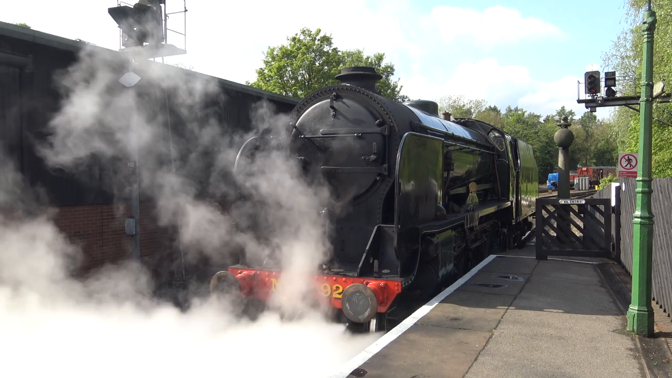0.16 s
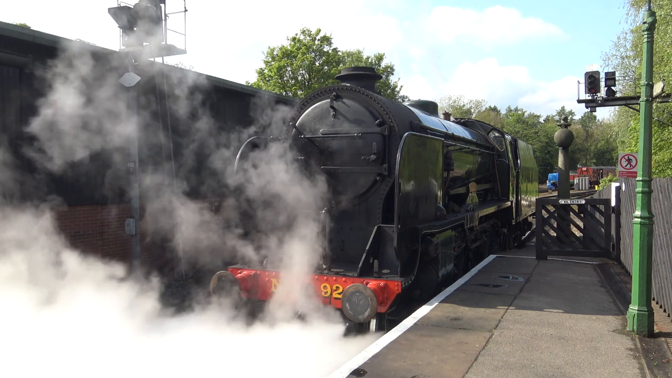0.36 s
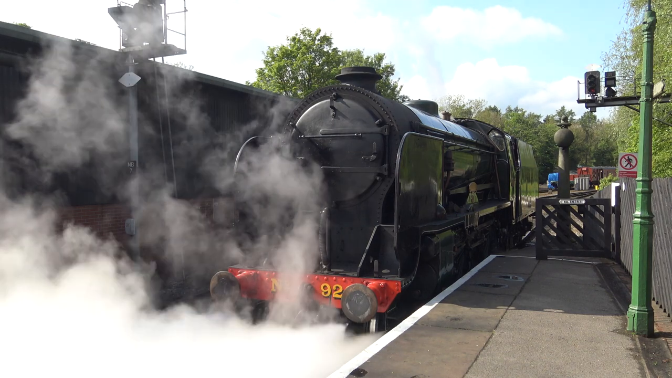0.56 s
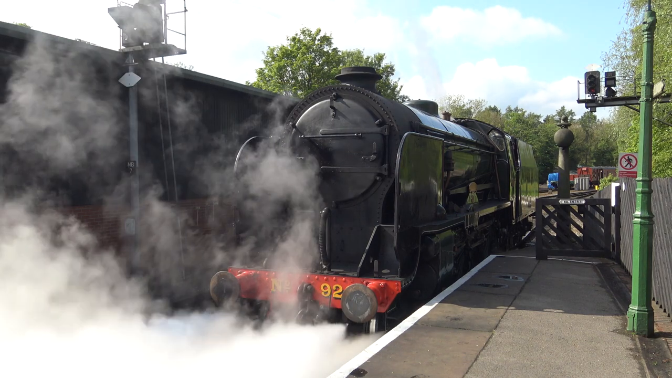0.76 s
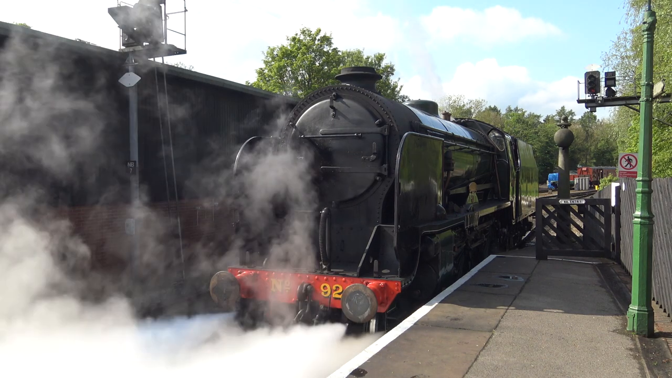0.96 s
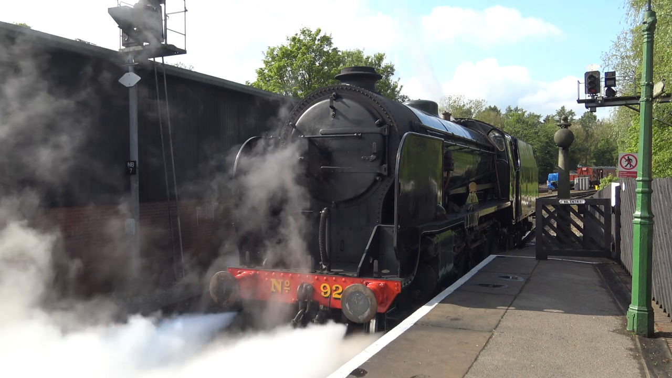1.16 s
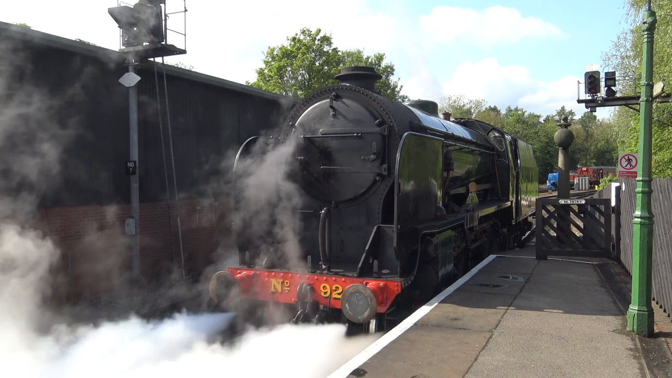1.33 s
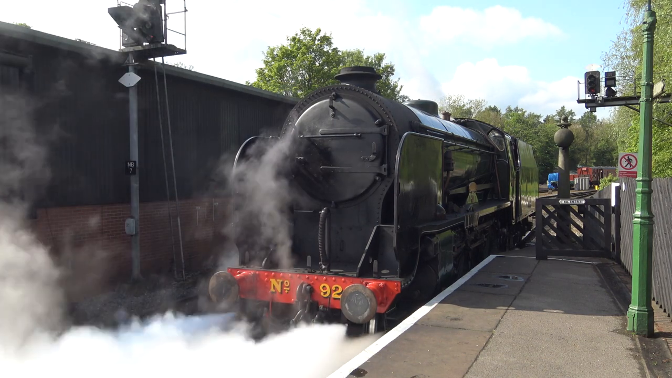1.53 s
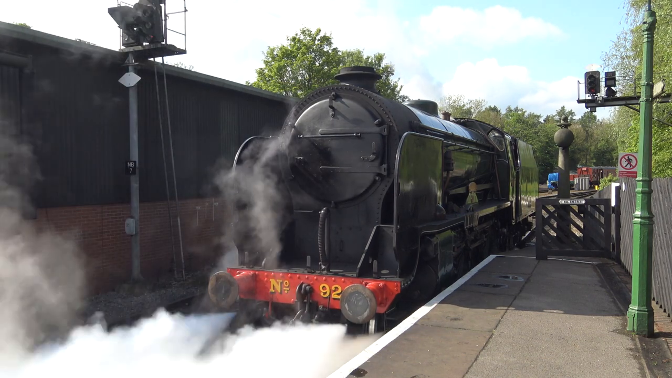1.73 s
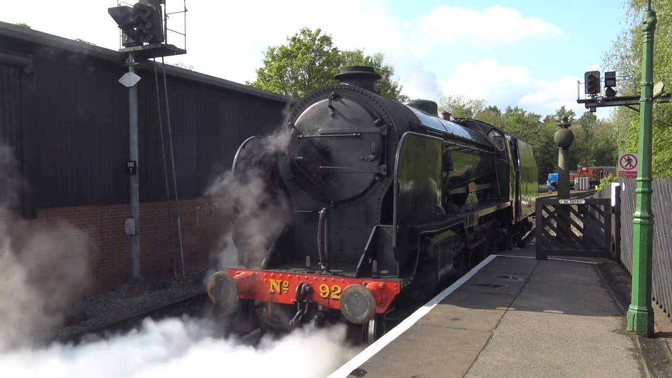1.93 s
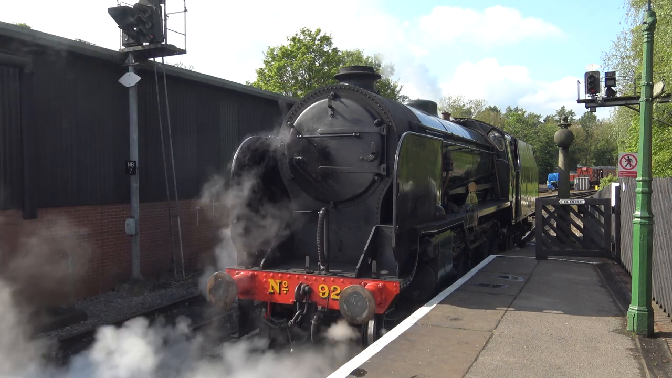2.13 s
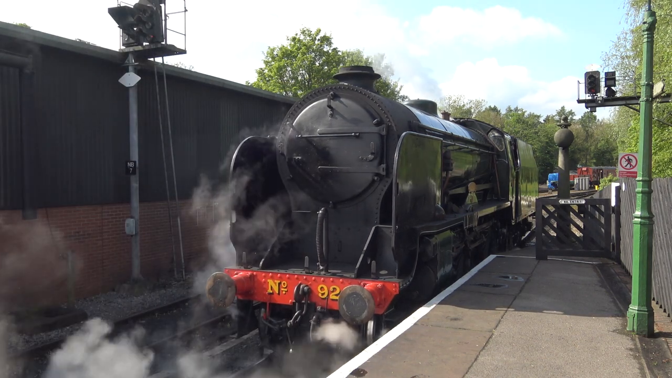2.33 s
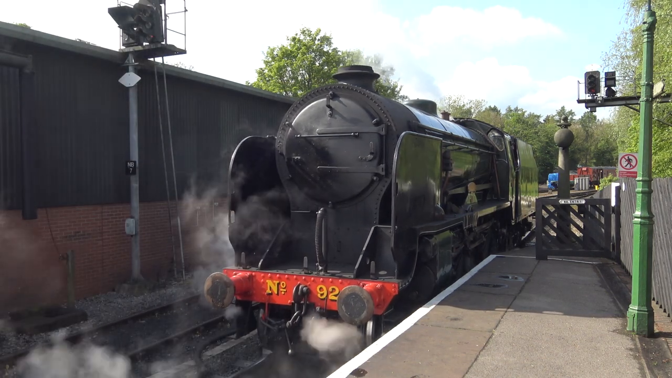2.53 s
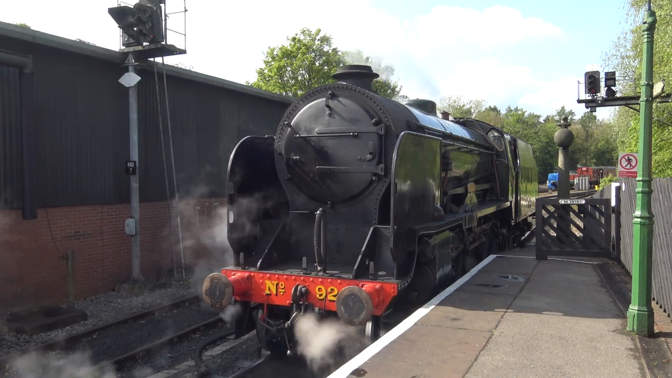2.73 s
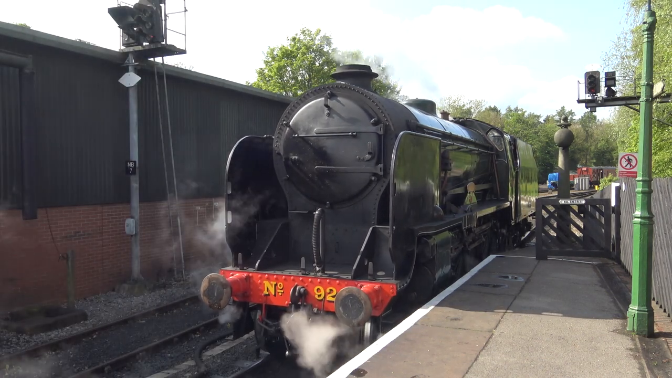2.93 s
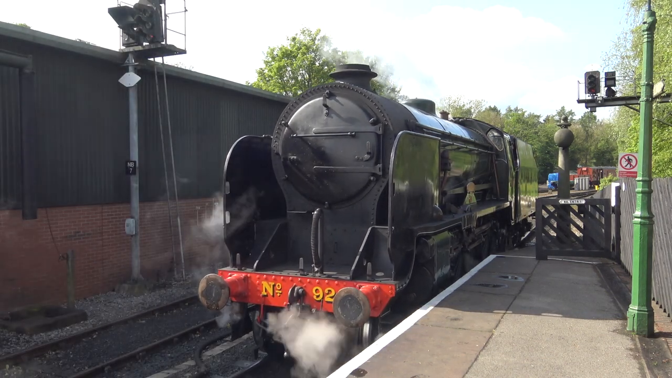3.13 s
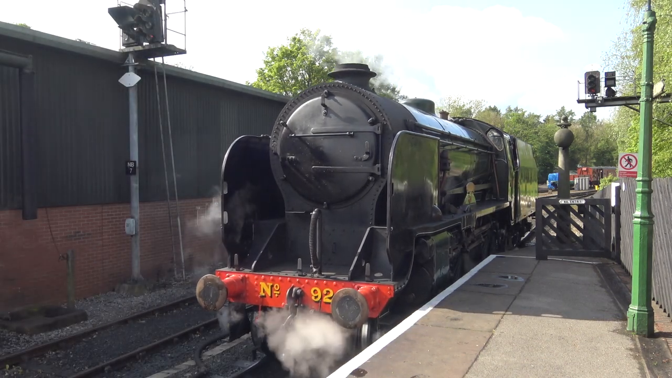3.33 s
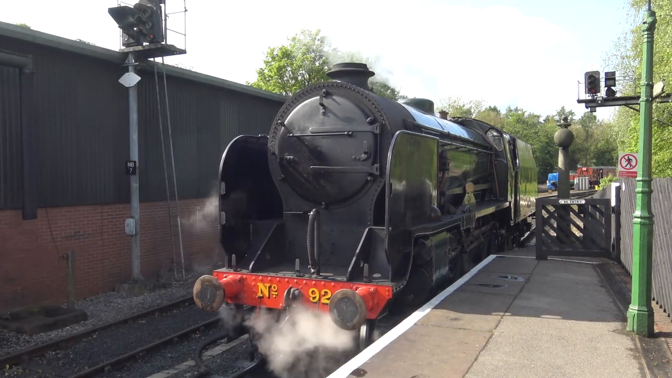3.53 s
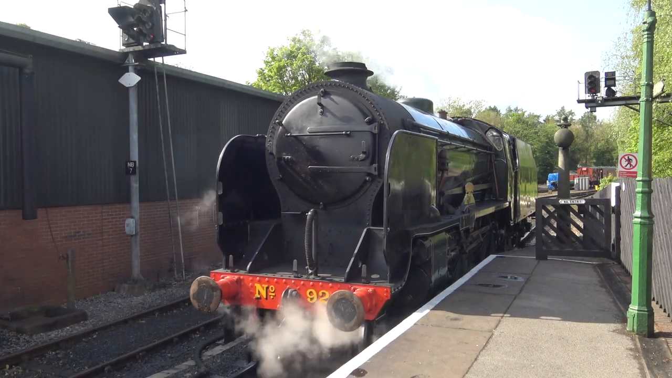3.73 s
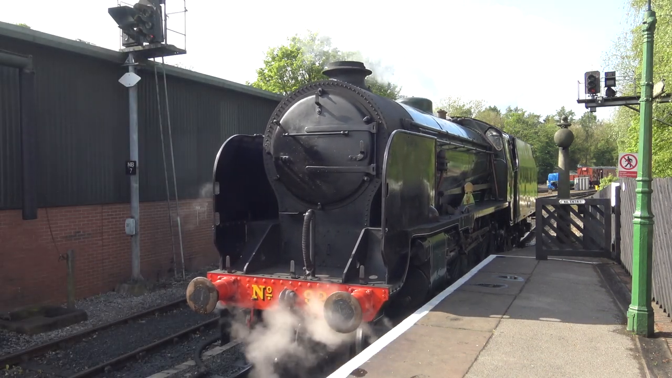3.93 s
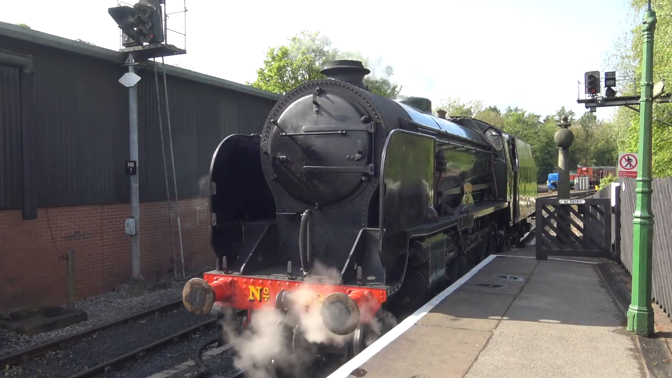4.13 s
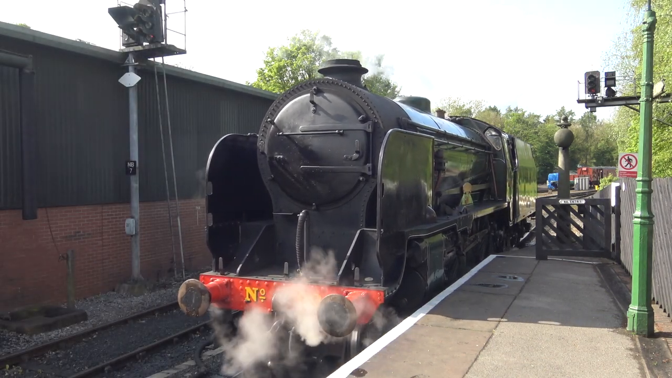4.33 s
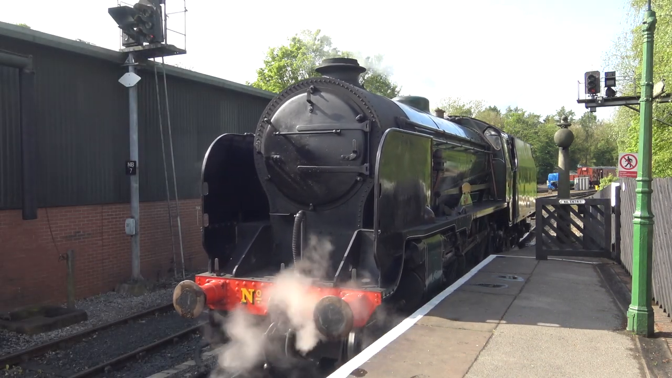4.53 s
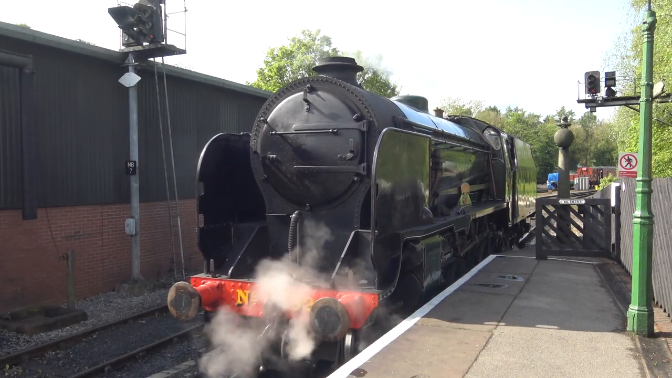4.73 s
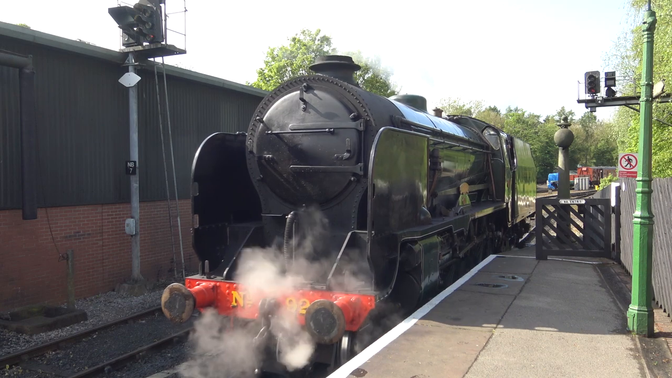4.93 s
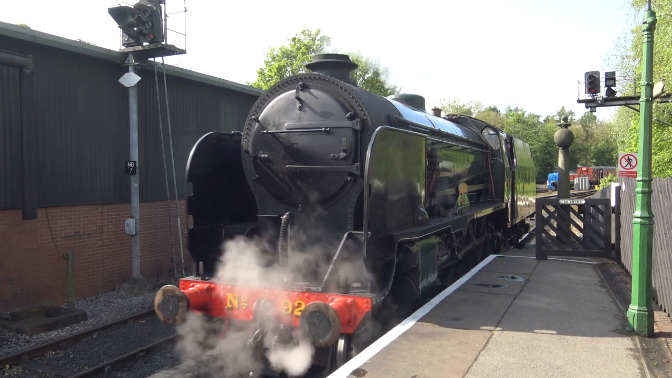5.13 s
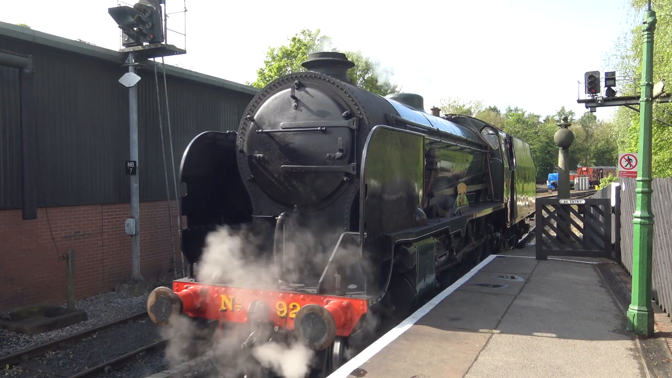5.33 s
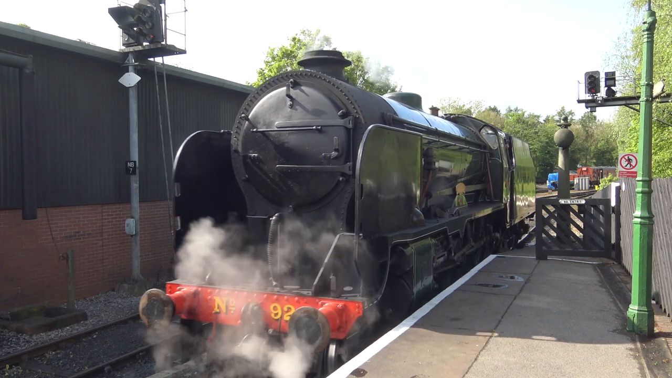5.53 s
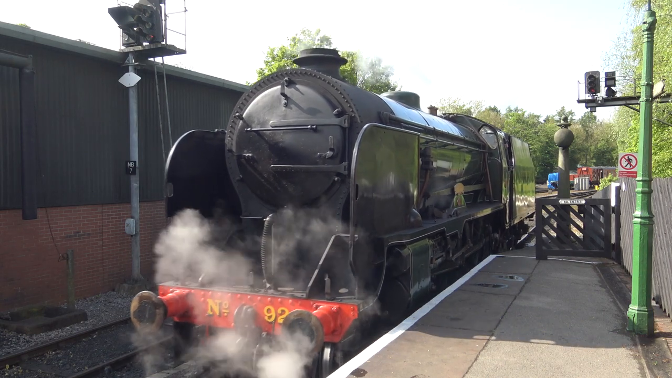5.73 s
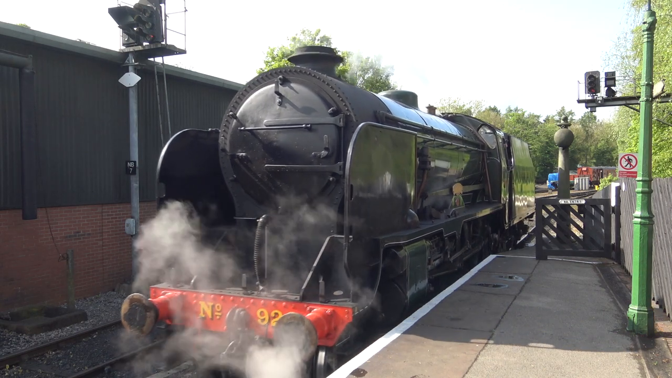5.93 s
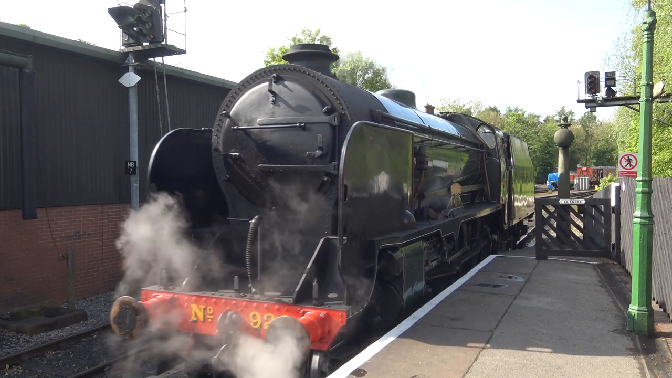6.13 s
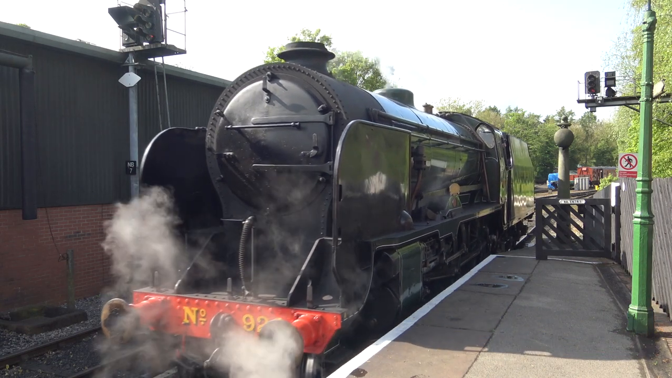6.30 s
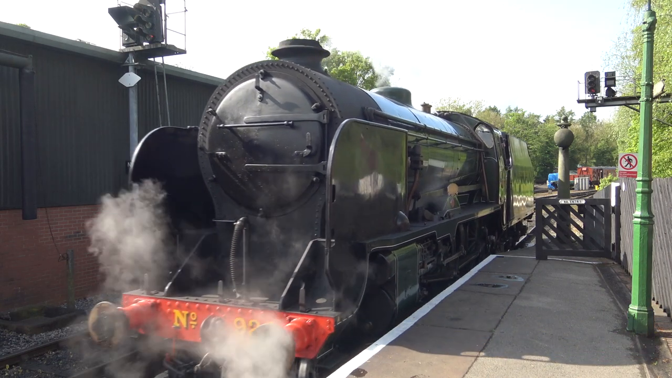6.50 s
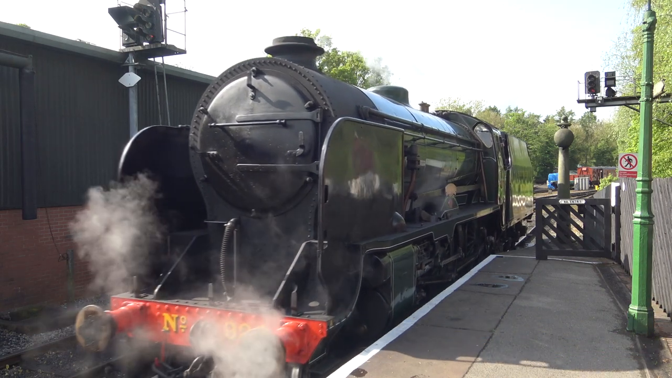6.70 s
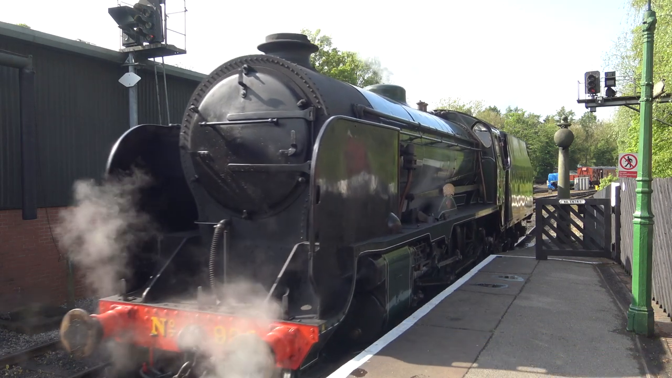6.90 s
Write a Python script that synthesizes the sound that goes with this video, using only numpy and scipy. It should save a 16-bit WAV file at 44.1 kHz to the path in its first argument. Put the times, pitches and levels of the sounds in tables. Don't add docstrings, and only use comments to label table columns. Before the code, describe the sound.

From 0 s a steam locomotive's open drain cock blasts very loud, bright broadband hiss, fairly smooth with a slight throaty ring. At about 0.43 s the flow breaks up: the microphone overloads, flattened and distorted, with rough low buffeting and irregular diaphragm thumps, growing heavier until 1.9 s. The cock then shuts within about a tenth of a second with a soft low thud. From 2.1 s a much quieter, steady, pipe-coloured steam hiss remains, over faint narrow boiler hum and distant low yard murmur. It swells slowly to 4.5 s, turning duller, then drops, weakest around 5.2 s, while light wind gusts press low on the microphone. From 5.5 s a darker steam jet surges, full by 5.9 s and loudest near 6.7 s with breathy high whistling. A short metal frame groan sounds around 6.05 s; wheel rumble grows faintly until 7 s.

```python
import sys
import numpy as np
from scipy import signal
from scipy.fft import rfft, irfft, next_fast_len
from scipy.io import wavfile
from scipy.ndimage import uniform_filter1d

SR = 44100
rng = np.random.default_rng(int(sys.argv[2]) if len(sys.argv) > 2 else 0)


def transcribe(signal):
    frames = np.atleast_2d(signal).T
    limited = np.clip(frames, -1, 1)
    pcm = np.round(limited * 32767).astype(np.int16)
    wavfile.write(sys.argv[1], SR, pcm)


def attenuation_scalar(level_db):
    decades = np.asarray(level_db, float) / 20
    return 10 ** decades


N = 311346
TIME = np.arange(N) / SR
SIZE = next_fast_len(N)
FREQ = np.maximum(np.arange(SIZE // 2 + 1) * SR / SIZE, 1)

BREAK_UP_S = 0.425
SHUT_S = 1.905

# (frequency [Hz], density [dB per Hz])
FAR_COLOUR = [(12, -30), (25, -20), (55, -7), (100, -3), (180, 0), (260, -8), (450, -36)]
# (frequency [Hz], density [dB per Hz])
WIND_COLOUR = [(8, -40), (22, -4), (40, 8), (60, -8), (110, -40)]
# (time [s], swell [dB], half length [s])
GUSTS = [
    (4.7, 4, .2),
    (5.08, 6, .2),
    (5.55, 2, .15),
    (5.84, -7, .06),
]
# (frequency [Hz], density [dB per Hz])
ROLL_COLOUR = [(40, -60), (80, -7), (120, -4), (160, -6), (240, -40)]
# (frequency [Hz], density [dB per Hz])
BOILER_COLOUR = [(80, -70), (180, -20), (240, -7), (300, -9.5), (450, -9.5), (620, -5), (700, -9.5),
                 (900, -8.5), (1100, -12), (1500, -40)]
# (frequency [Hz], width [Hz], boost [dB])
BOILER_MODES = [(380, 23, 5), (510, 19, 3), (890, 13, 9)]
# (frequency [Hz], width [Hz], peak [dB], centre [s], half length [s])
SINGING = [
    (616, 14, -59, 4.2, 1.7),
    (239.3, 17, -61, 5.5, 1.8),
    (324, 18, -59, 5.9, 1.4),
    (321, 20, -59, 2.11, 0.13),
    (75, 50, -64, 3.36, .04),
    (35, 30, -53, 1.98, .04),
    (42, 8, -70, 5.9, 1.4),
]
# (frequency [Hz], width [Hz], peak [dB], centre [s], half length [s])
GROAN = [
    (224, 14, -49, 6.03, 0.071),
    (370, 22, -47.5, 6.07, 0.11),
    (518, 22, -56, 6.06, .1),
    (597, 20, -55, 5.6, .1),
    (325, 22, -53, 5.95, .04),
    (430, 30, -56, 6.01, .06),
]
# (frequency [Hz], width [Hz], peak [dB], centre [s], half length [s])
WHISTLES = [
    (3150, 500, -39, 6.7, .13),
    (2250, 300, -40, 6.95, .1),
]

# (time [s], level [dB], treble against middle [dB])
LEAK = [
    (0.0, -43, -5),
    (2.1, -38.5, 1),
    (2.85, -38.5, .5),
    (3.35, -37, -.5),
    (4.1, -36.5, -1),
    (4.5, -36, -4),
    (4.85, -42, 0),
    (5.15, -43.5, -3),
    (5.62, -36, -8),
]
# (time [s], level [dB], treble against middle [dB])
PUFF = [
    (5.2, -44, -7),
    (5.5, -40.5, -6.5),
    (5.88, -31.5, -6),
    (6.11, -32.5, -5),
    (6.5, -32, -3.5),
    (6.68, -29.5, -5),
    (7.06, -31, -8),
]
# (frequency [Hz], density [dB per Hz])
LEAK_COLOUR = [(250, -70), (600, -18), (950, -11), (1150, -3), (1350, -3), (1600, -5), (2050, -3),
               (2800, -6), (3400, -9), (5500, -8), (8700, -8.5), (10500, -11.5), (13500, -10), (15500, -13)]
# (frequency [Hz], density [dB per Hz])
PUFF_COLOUR = [(300, -50), (650, -17), (950, -10.5), (1140, -4), (1640, -4), (2720, -3.5), (3920, -6),
               (7240, -14.5), (8400, -13.5), (10800, -19.5), (13500, -17), (15500, -20)]
# (frequency [Hz], width [Hz], boost [dB])
LEAK_PIPE = [(1150, 48, 4.5), (1317, 50, 6.5), (1900, 63, 6), (2070, 68, 4), (2250, 18, 5), (2850, 74, 4.5),
             (3740, 150, 3.5)]
# (frequency [Hz], width [Hz], boost [dB])
PUFF_PIPE = [(950, 25, 6), (1050, 25, 5.5), (1175, 60, 3), (1240, 25, 0.5), (1360, 23, 8), (2700, 120, 2.5)]

# (time [s], level [dB])
BLAST = [
    (0.0, -16.5),
    (0.2, -14),
    (0.46, -15.5),
    (1.0, -13),
    (1.7, -12),
    (1.9, -14.5),
    (1.945, -18.5),
    (1.98, -29),
    (2.08, -50),
]
# (frequency [Hz], density [dB per Hz])
BLAST_COLOUR = [(150, -45), (400, -24), (1000, -12.5), (1300, -3), (1750, -3), (2360, 0), (3200, 0),
                (5480, 1), (6460, -.5), (8300, 1), (10400, -4.5), (13000, -3), (15500, -5.5)]
# (lag [ms], level [dB])
BALLAST_ECHOES = [
    (2.64, -14),
    (2.49, -17),
    (3.03, -22),
]
# (frequency [Hz], density [dB per Hz])
BUFFET_COLOUR = [(12, -16), (25, 0), (60, 0.5), (140, 0), (250, -2), (450, -4.5), (900, -8), (1600, -21),
                 (2500, -50)]
# (time [s], signed push [full scale], length [ms])
THUMPS = [(0.433, -0.089, 2.9), (0.472, 0.09, 1.8), (0.487, 0.08, 1.4), (0.516, -0.13, 2.7),
          (0.607, 0.059, 1.6), (0.617, -0.082, 2.5), (0.66, -0.067, 2.4), (0.687, -0.064, 3.6),
          (0.697, 0.072, 4.2), (0.936, -0.11, 2.7), (0.963, -0.14, 2.6), (1.193, 0.063, 3.1),
          (1.251, 0.14, 1.8), (1.272, -0.13, 2.0), (1.292, 0.14, 1.9), (1.355, -0.095, 2.5),
          (1.398, -0.056, 2.7), (1.419, -0.16, 3.8), (1.439, 0.092, 2.0), (1.725, 0.17, 2.8),
          (1.736, 0.11, 2.2), (1.796, 0.11, 2.5)]

# (centre [s], low edge [Hz], high edge [Hz])
SPLITS = [(0.1, 5670, 7550), (0.33, 7600, 9000), (0.332, 11600, 13100), (0.679, 8900, 10400),
          (0.703, 5700, 8400), (0.704, 10900, 13900), (0.878, 5200, 7700), (0.89, 8950, 11000),
          (0.911, 13000, 14600), (1.028, 4220, 7000), (1.029, 8200, 9700), (1.191, 4740, 5750),
          (1.283, 8300, 9700), (1.283, 12400, 15900), (1.4, 6800, 8400), (1.563, 4230, 7000),
          (1.665, 4700, 8300), (1.667, 8900, 10400), (2.097, 4640, 6400), (2.7, 9000, 12500),
          (2.747, 4600, 5800), (3.094, 4630, 5700), (3.907, 10900, 14600), (4.023, 6200, 7600),
          (4.373, 5100, 7700), (4.605, 4100, 5260), (5.091, 6200, 7700), (5.278, 10900, 15200),
          (6.044, 8200, 9700), (6.182, 9600, 14600)]


def unit(x):
    return x / np.sqrt(np.mean(x ** 2))


def columns(table, outside_db=-90):
    s, first, *rest = np.transpose(table)
    level = np.interp(TIME, s, first, outside_db, outside_db)
    return level, *(np.interp(TIME, s, column) for column in rest)


def colour(points, modes=()):
    hz, db = np.transpose(points)
    gain_db = np.interp(np.log(FREQ), np.log(hz), db)
    return gain_db + sum(boost / (1 + (2 * (FREQ - f) / width) ** 2) for f, width, boost in modes)


def swell(centre_s, half_s):
    return np.exp(-((TIME - centre_s) / half_s) ** 2)


def walk(rate):
    hold = int(SR / rate)
    steps = np.repeat(rng.standard_normal(N // hold + 1), hold)
    return 1.24 * uniform_filter1d(uniform_filter1d(steps, hold), hold)[:N]


def turbulence(gain_db, lo_hz, hi_hz, flicker_db, surge_db, treble_db=0):
    spec = rfft(rng.standard_normal(SIZE)) * attenuation_scalar(gain_db)
    inside = (FREQ > lo_hz) & (FREQ < hi_hz)
    spec = spec / np.sqrt(2 * np.sum(abs(spec[inside]) ** 2)) * SIZE
    surge, out = surge_db * walk(5), 0
    heard = np.log2(FREQ[gain_db > gain_db.max() - 35])
    for octave in range(int(heard[0]), min(int(heard[-1]) + 2, 15)):
        share = np.cos(np.pi / 2 * np.clip(np.log2(FREQ) - octave, -1, 1)) ** 2
        bright = np.clip((octave - 11) / 1.5, 0, 1)
        level_db = surge + flicker_db * walk(11) + bright * treble_db
        out = out + irfft(spec * share, SIZE)[:N] * attenuation_scalar(level_db)
    return out


def ring(hz, width, db, s, length):
    band = irfft(rfft(rng.standard_normal(SIZE)) / (1 + (2 * (FREQ - hz) / width) ** 2), SIZE)[:N]
    shape = np.exp(-((TIME - s) / length) ** 4)
    return band * shape * attenuation_scalar(db) * np.sqrt(np.sum(shape ** 2) / np.sum((band * shape) ** 2))


def steam_flow():
    leak_db = np.interp(TIME, *np.transpose(LEAK)[:2])
    return np.maximum(leak_db, columns(PUFF)[0]) + 38


def settling():
    return 14 * np.exp(-np.maximum(TIME - SHUT_S, 0) / 0.12)


def distant_yard():
    return turbulence(colour(FAR_COLOUR), 45, 200, 0.8, 0.5) * attenuation_scalar(-65.5 + 0.3 * steam_flow())


def wind():
    breeze_db = -93 + 3.6 * TIME
    gust_db = sum(db * swell(s, length) for s, db, length in GUSTS)
    return turbulence(colour(WIND_COLOUR), 18, 70, 1.5, 0.8) * attenuation_scalar(breeze_db + gust_db + 1.1 * settling())


def wheels():
    start_s, start_db, top_db, db_per_s = 5.5, -76, -60, 12
    roll_db = np.minimum(start_db + db_per_s * np.maximum(TIME - start_s, 0), top_db)
    return turbulence(colour(ROLL_COLOUR), 75, 170, 1.1, 0.8) * attenuation_scalar(roll_db + settling())


def boiler():
    hum_db = -53 + 0.45 * steam_flow() + 0.3 * settling()
    return turbulence(colour(BOILER_COLOUR, BOILER_MODES), 170, 800, 1.1, 0.6) * attenuation_scalar(hum_db)


def metalwork():
    return sum(ring(*row) for row in SINGING + GROAN + WHISTLES)


def yard_echoes(x):
    echo_db, t60_s = -16, 0.12
    lag = rng.uniform(0.003, 0.06, 24)
    paths = np.zeros(SIZE)
    paths[(lag * SR).astype(int)] = rng.standard_normal(24) * attenuation_scalar(echo_db - 60 * lag / t60_s)
    paths[0] = 1
    return irfft(rfft(x, SIZE) * rfft(paths / np.sqrt(np.sum(paths ** 2))), SIZE)[:N]


def gland_leak():
    level_db, treble_db = columns(LEAK)
    return turbulence(colour(LEAK_COLOUR, LEAK_PIPE), 900, 3500, 0.81, 0.44, treble_db + 0.55) * attenuation_scalar(level_db)


def stroke_puff():
    level_db, treble_db = columns(PUFF)
    return turbulence(colour(PUFF_COLOUR, PUFF_PIPE), 900, 3700, 0.48, 0.37, treble_db + 4.96) * attenuation_scalar(level_db)


def leaks():
    change_s, fade_s = 5.48, 0.17
    turned = 0.5 + 0.5 * np.tanh((TIME - change_s) / fade_s)
    return gland_leak() * np.sqrt(1 - turned) + stroke_puff() * np.sqrt(turned)


def thumps():
    out, reach = np.zeros(N), np.arange(-800, 800)
    for s, push, ms in THUMPS:
        u = reach / SR * 1000 / ms
        out[int(s * SR) + reach] += 1.3 * push * (1 - 1.5 * u ** 2) * np.exp(-1.2 * u ** 2)
    return out


def buffeting_level():
    smooth_db, ragged_db, full_db, grow_s = -62, -30.5, -24, 0.75
    still_to_grow = np.clip(1 - (TIME - BREAK_UP_S) / grow_s, 0, 1)
    ragged = full_db + (ragged_db - full_db) * still_to_grow
    ragged = ragged - 7 * swell(0.575, 0.03)
    return np.where(TIME < BREAK_UP_S, smooth_db, ragged) - 550 * np.maximum(TIME - SHUT_S, 0)


def buffeting():
    hits = rng.random(N) < 1100 / SR
    knocks = hits * rng.standard_normal(N) * attenuation_scalar(2.2 * walk(30))
    shaking = unit(irfft(rfft(knocks, SIZE) * attenuation_scalar(colour(BUFFET_COLOUR)), SIZE)[:N])
    return shaking * attenuation_scalar(buffeting_level())


def jet_roar(level_db):
    treble_db = 0.6 * (TIME < BREAK_UP_S)
    jet = turbulence(colour(BLAST_COLOUR), 1000, 15000, 0.38, 0.5, treble_db)
    turn_per_ms = -2j * np.pi * FREQ / 1000
    paths = 1 + sum(attenuation_scalar(db) * np.exp(turn_per_ms * ms) for ms, db in BALLAST_ECHOES)
    return unit(irfft(rfft(jet, SIZE) * paths, SIZE)[:N]) * attenuation_scalar(level_db)


def blast():
    level_db, = columns(BLAST)
    throat = ring(1310, 260, -31.5, 0.3, 0.25)
    overdrive = attenuation_scalar(14.5 * np.clip((level_db + 22.5) / 10.2, 0, 1))
    return overdrive * (jet_roar(level_db) + buffeting() + thumps() + throat)


def scene():
    underneath = distant_yard() + wind() + wheels() + boiler() + metalwork()
    return np.tile(underneath + yard_echoes(leaks()) + blast(), (2, 1))


def input_stage(x):
    ceiling = 0.29 * attenuation_scalar(0.7 * np.exp(-(TIME / 0.45) ** 2))
    squashed = x / (1 + abs(x / ceiling) ** 6) ** (1 / 6)
    shelf = attenuation_scalar(np.interp(FREQ, [20, 8800, 10200, 16000], [0.5, 1, -3.5, -7.0])) * (FREQ < 15740)
    return irfft(rfft(squashed, SIZE) * shelf, SIZE)[:N]


def split_treble(out):
    size = 2048
    bins = np.arange(size // 2 + 1) * SR / size
    fade = np.sin(np.pi * np.arange(size) / size)
    for s, lo, hi in SPLITS:
        middle = int(s * SR)
        span = slice(middle - size // 2, middle + size // 2)
        band = (bins > lo) * (bins < hi)
        own = irfft(rfft(fade * out[:, span]) * band, size)
        noise = unit(irfft(rfft(rng.standard_normal((2, size))) * band, size)) * own.std() * attenuation_scalar(3.2)
        out[:, span] += fade * (noise - own)
    return out


def band_limit(x):
    return signal.sosfilt(signal.butter(12, 16650, fs=SR, output="sos"), x)


def record(dry):
    mix = split_treble(np.tile(input_stage(dry[0]), (2, 1)))
    return band_limit(mix)


dry = scene()
out = record(dry)
transcribe(out)
```